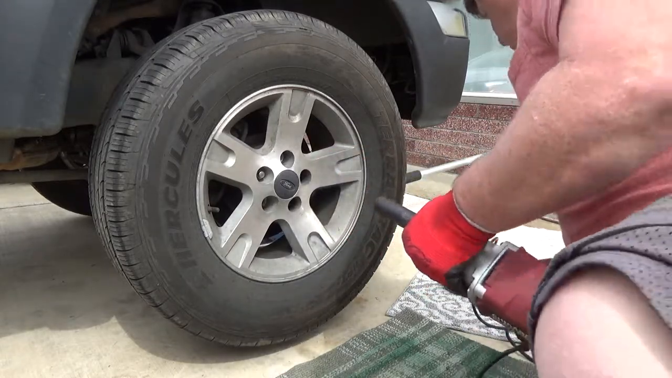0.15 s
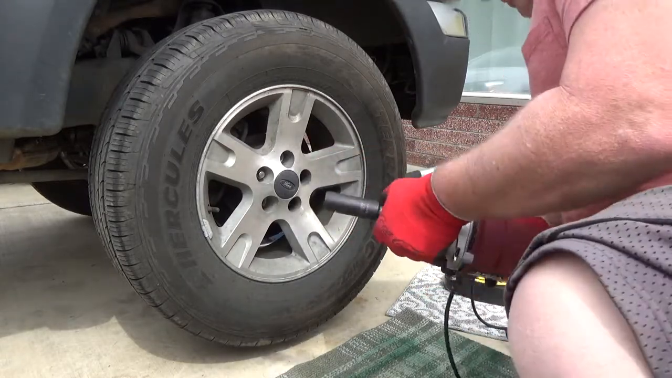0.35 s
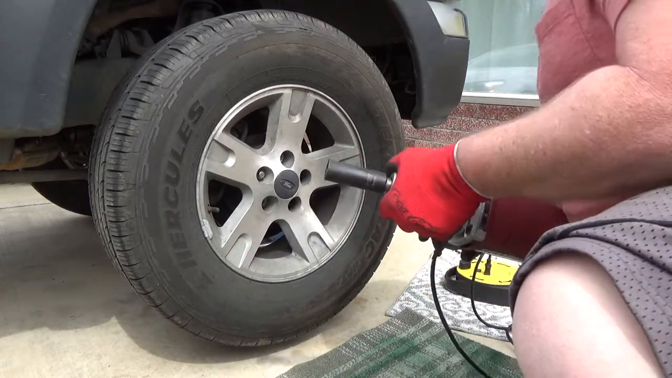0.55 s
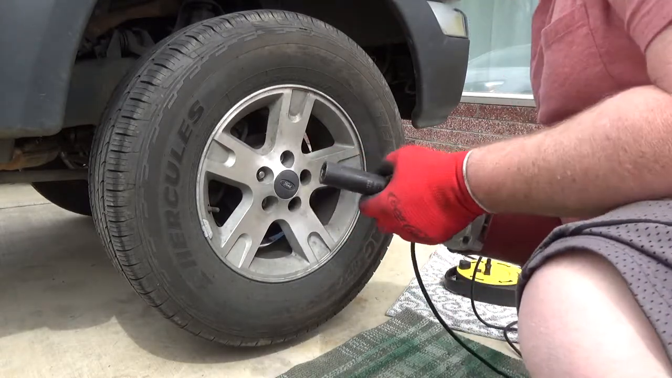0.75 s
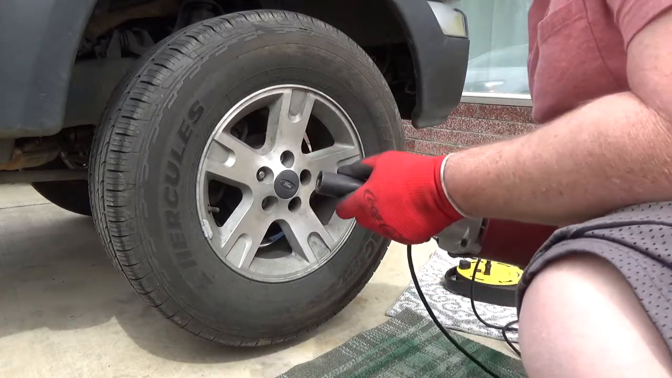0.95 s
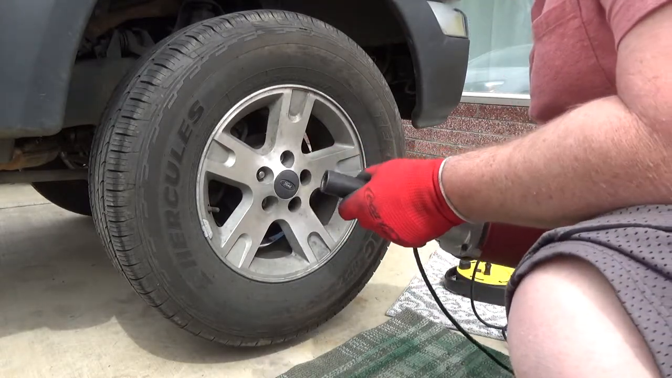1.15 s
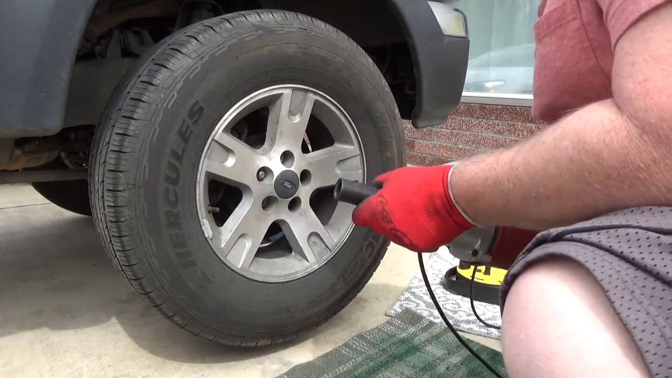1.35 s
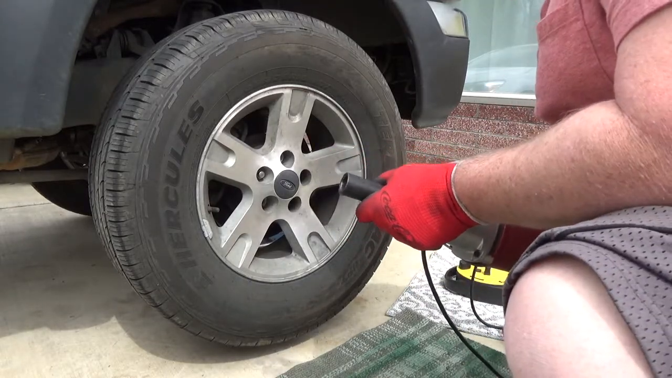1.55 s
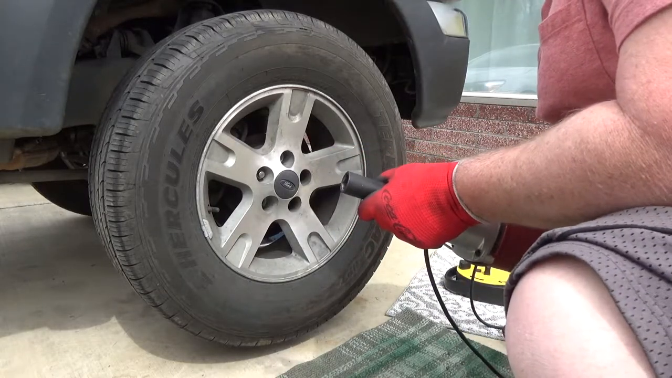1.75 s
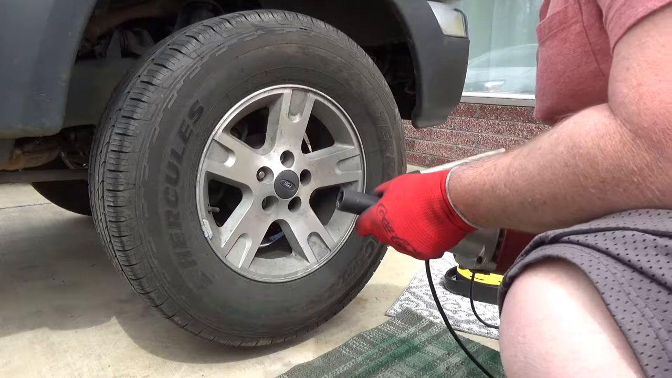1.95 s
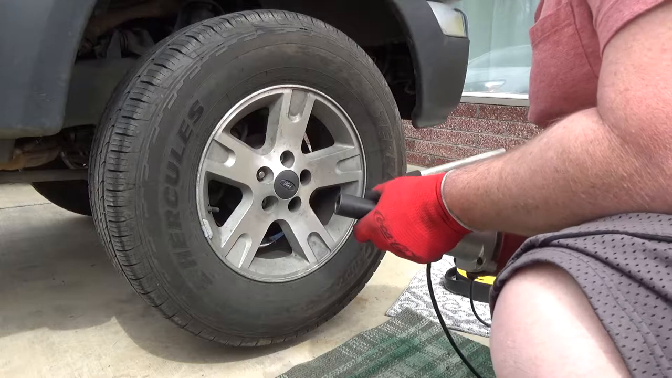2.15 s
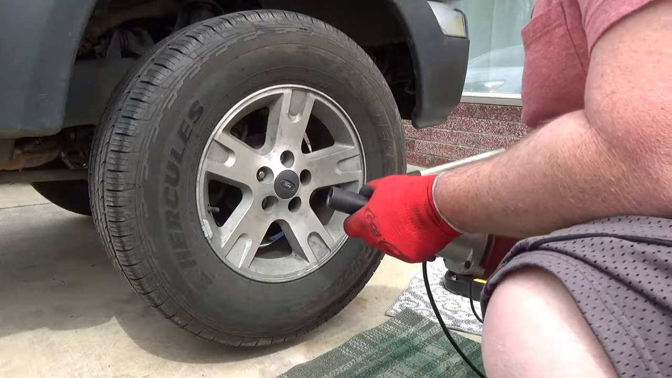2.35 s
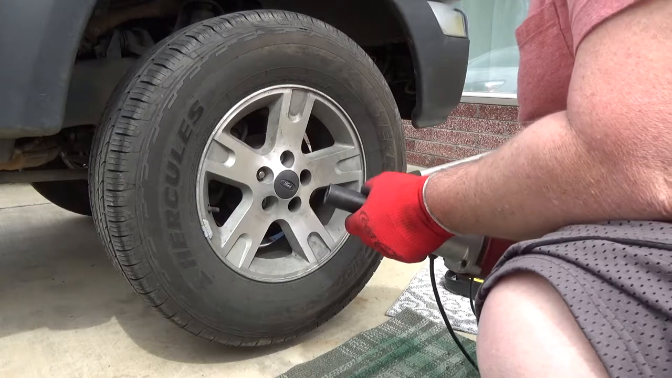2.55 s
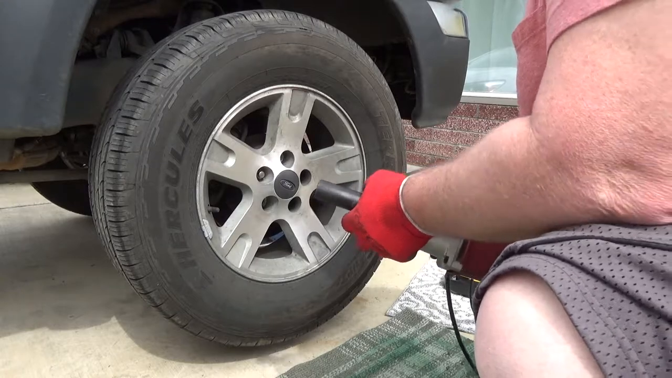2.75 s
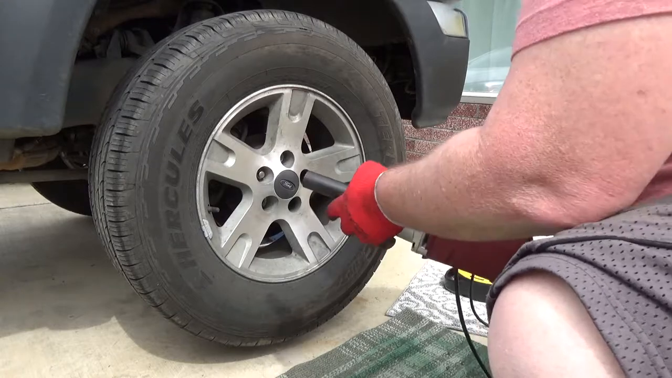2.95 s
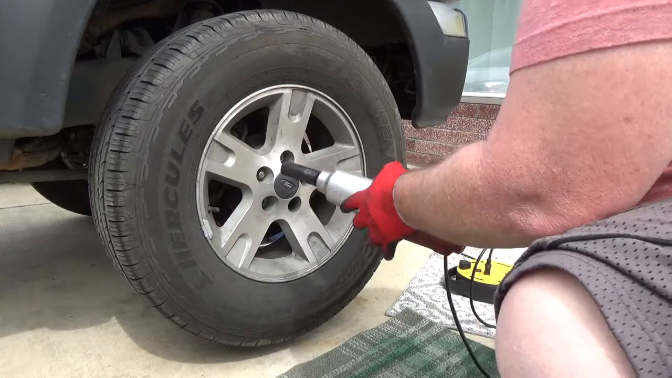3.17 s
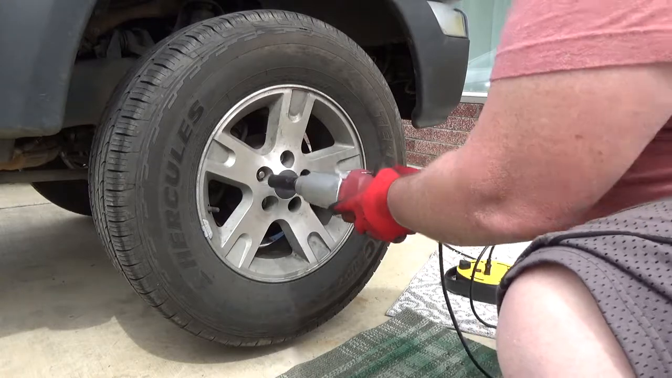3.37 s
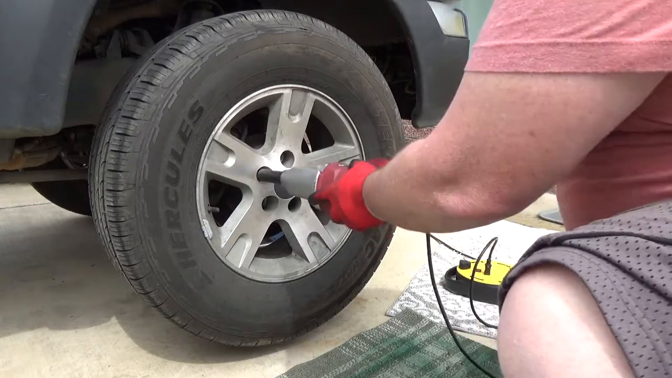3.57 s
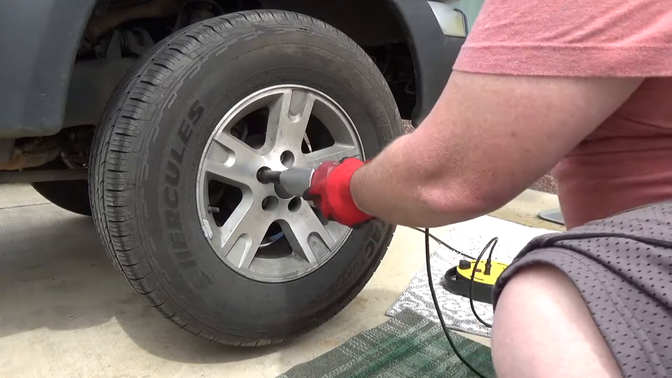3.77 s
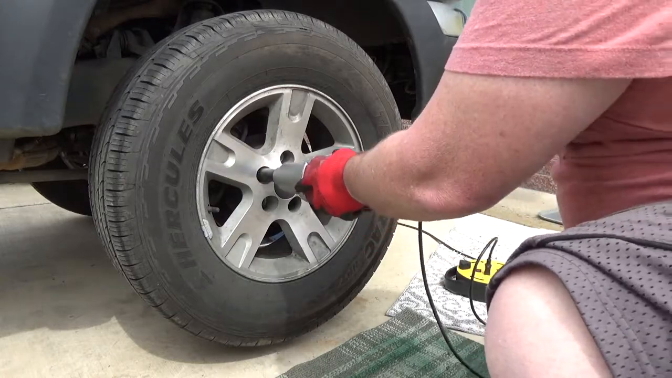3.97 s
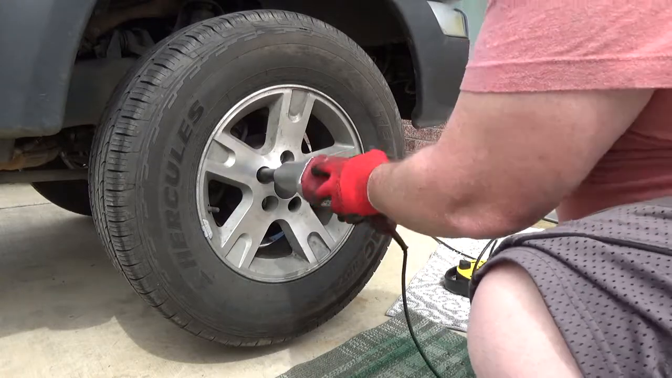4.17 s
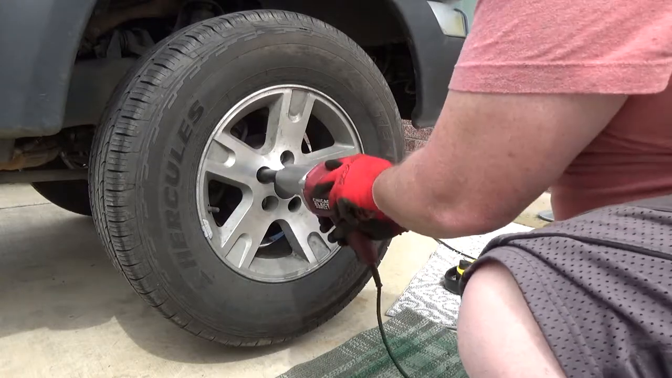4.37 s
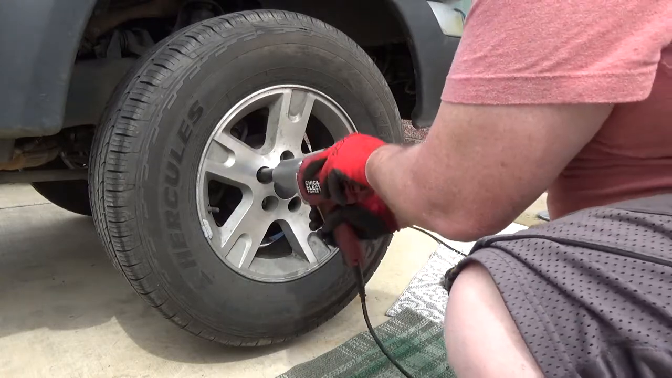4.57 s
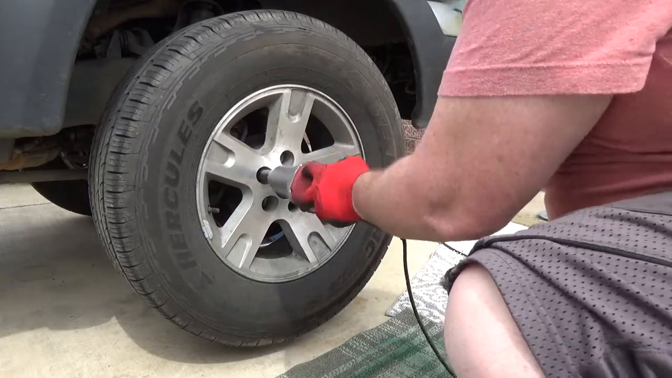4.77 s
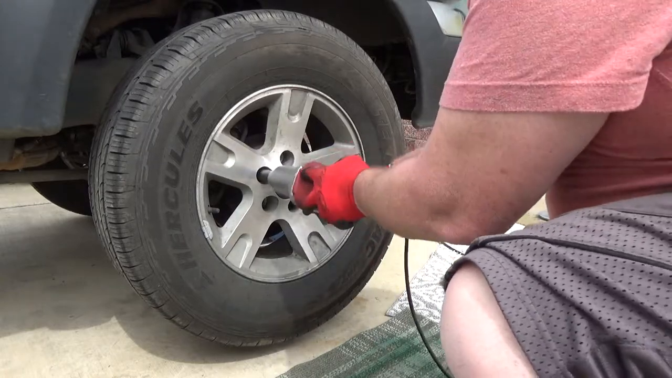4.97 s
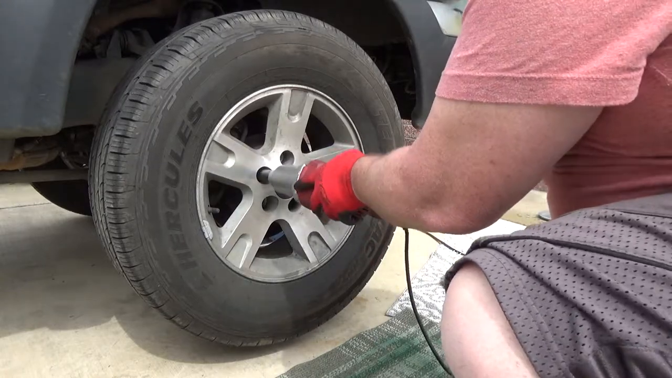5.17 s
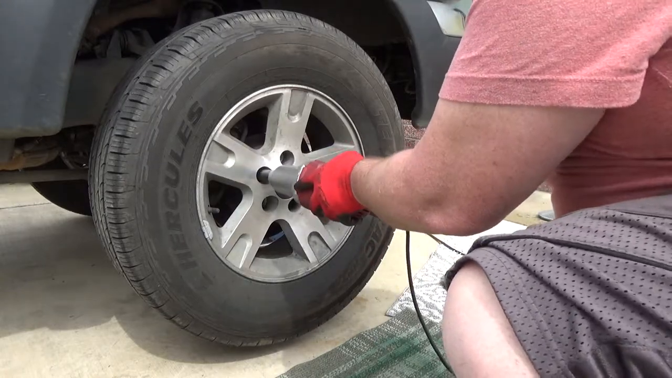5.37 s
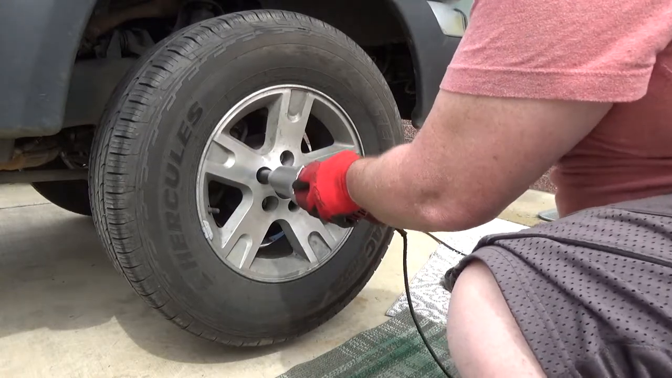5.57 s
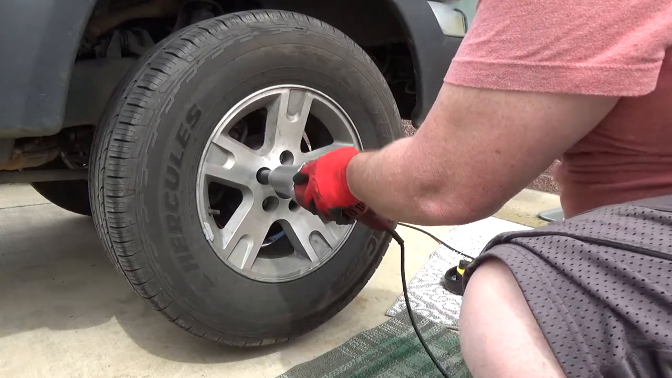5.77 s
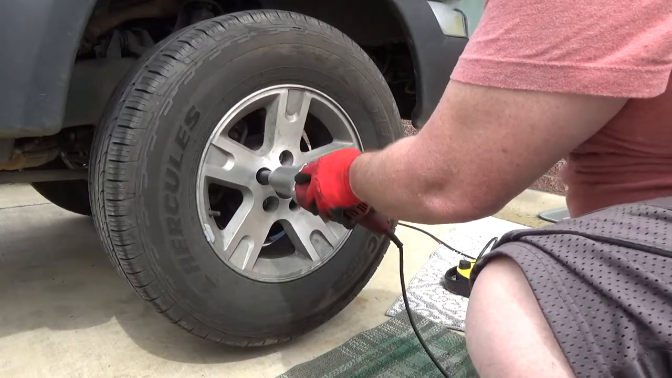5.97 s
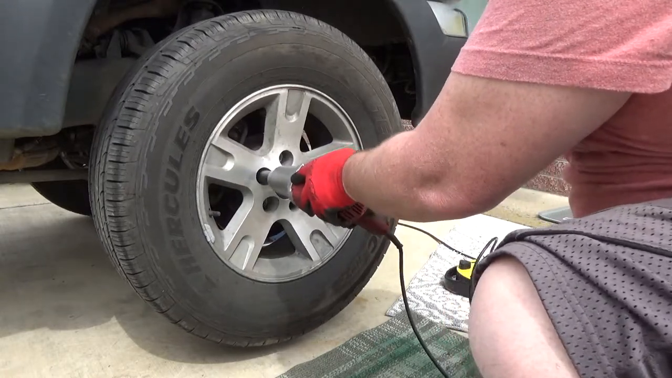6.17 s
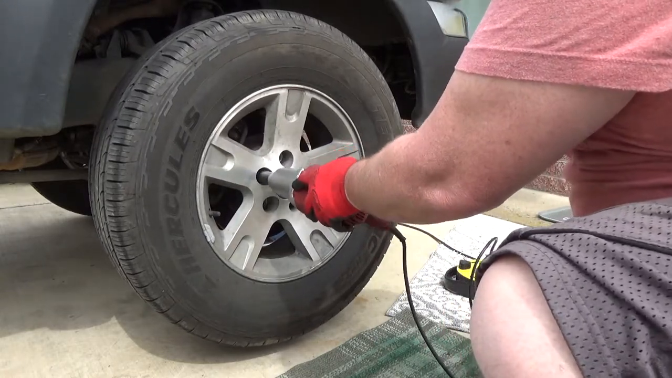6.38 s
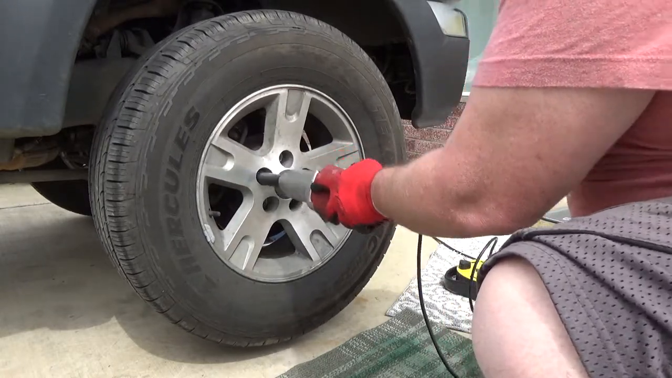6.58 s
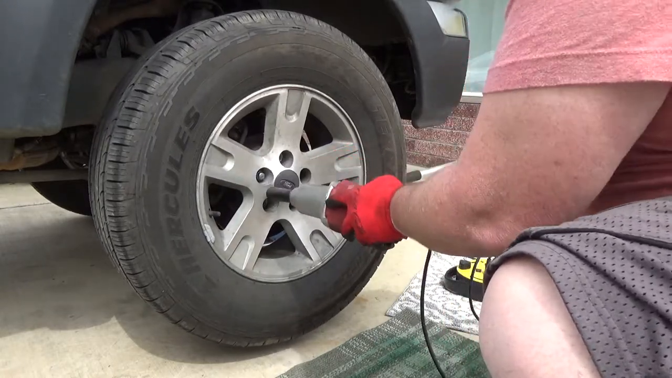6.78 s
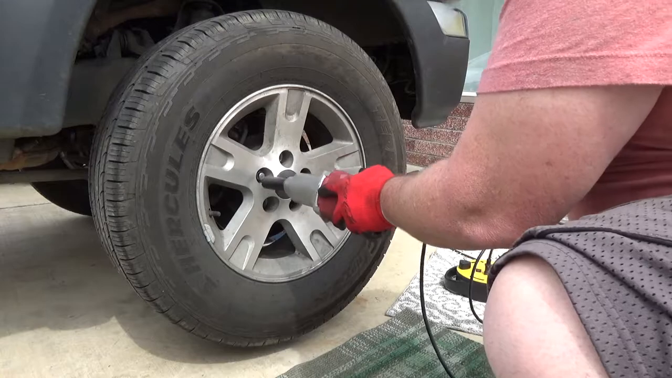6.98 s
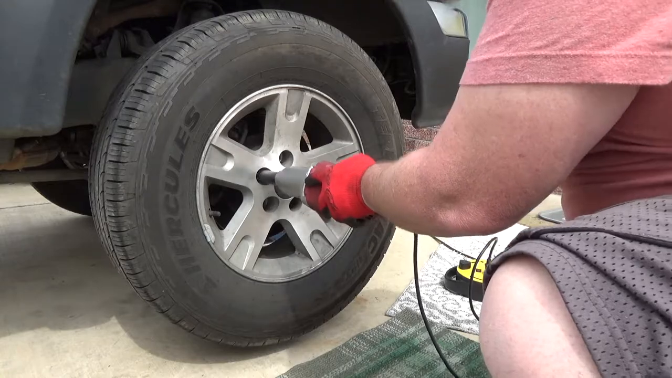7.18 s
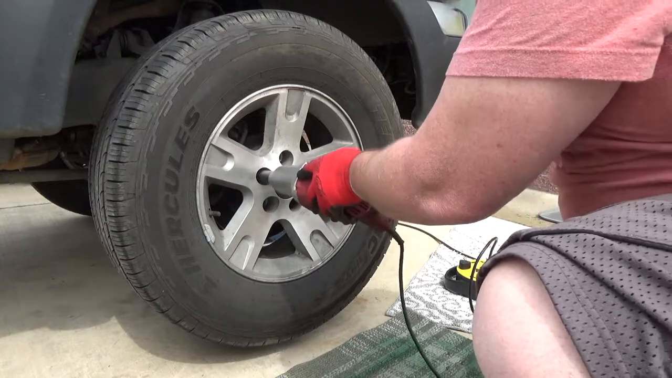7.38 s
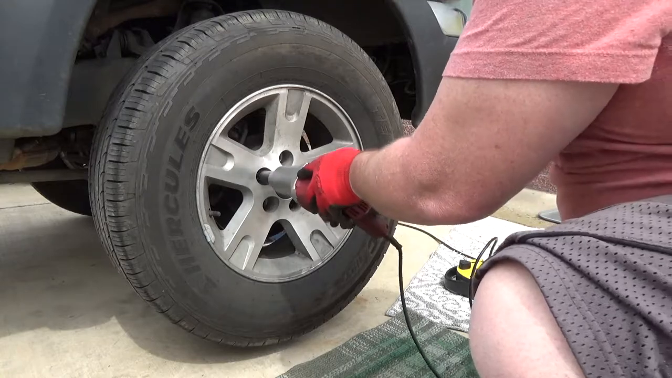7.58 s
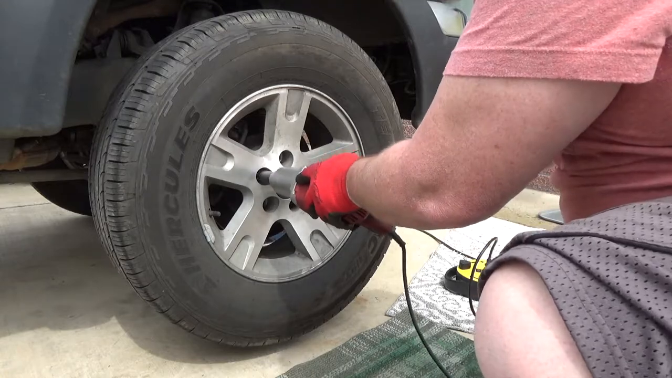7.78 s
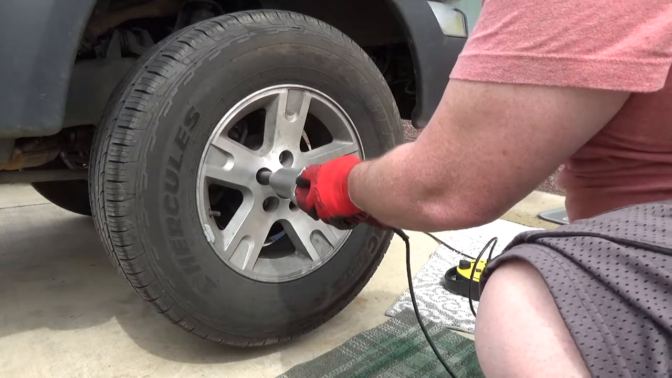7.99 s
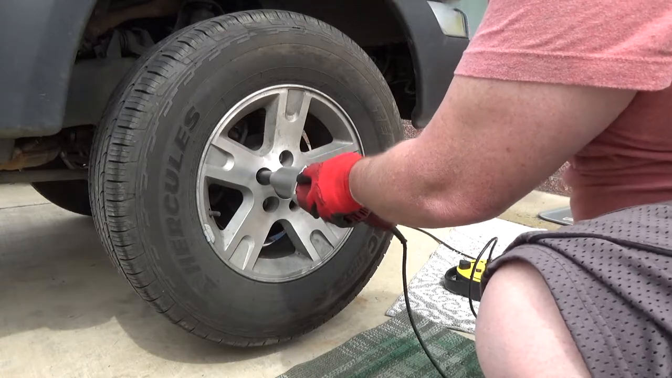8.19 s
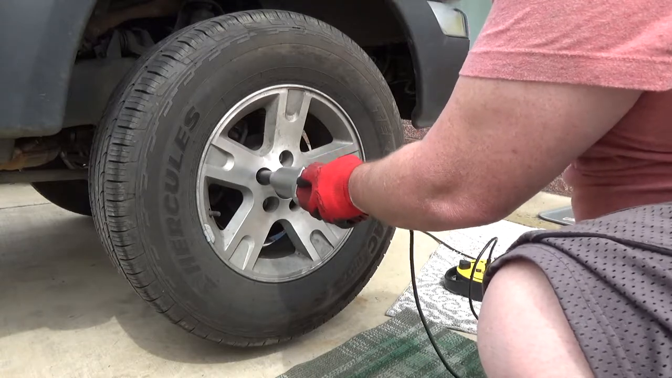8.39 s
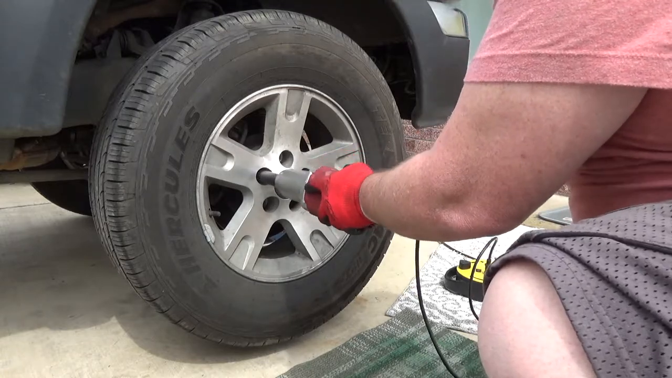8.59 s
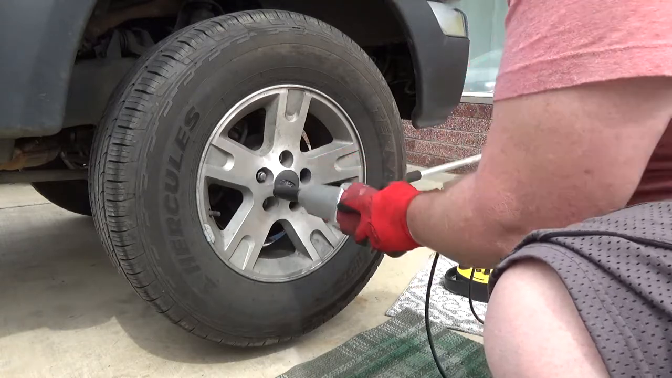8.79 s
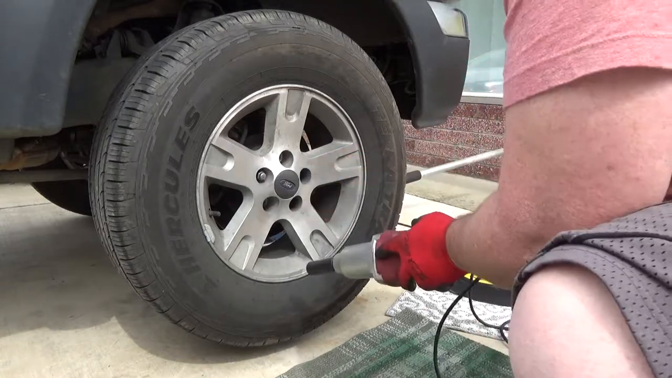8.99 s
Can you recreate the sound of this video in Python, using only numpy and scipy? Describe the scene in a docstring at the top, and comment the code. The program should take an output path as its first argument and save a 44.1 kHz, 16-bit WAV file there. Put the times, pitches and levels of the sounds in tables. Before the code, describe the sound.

A corded impact wrench works close by in a yard, with short echoes, faint outdoor hiss and a distant machine's hum. After a light knock, the motor spins up in the air at about 1.1 seconds and again at 2.1, each time whining and chattering as it winds down. A brief gust rumbles on the microphone at 1.6. From 3 to 5 seconds, gloves rub softly and the steel socket clicks and knocks onto a wheel nut. At 5.5 a sharp clank starts the loudest part: rapid hammering for just over half a second, leaving the wheel ringing briefly. Small clicks follow around 7 seconds. At 7.6 the motor runs again with hard knocks, then a few quick blows and a tiny squeak near 7.9 as a second nut loosens. Scattered clinks and soft rustling continue until about 9 seconds.

```python
"""A corded impact wrench works on a car wheel in a driveway. Its motor spins up twice in the air, with
chattering gear teeth, a hissing fan and a whine. The socket is knocked onto a wheel nut, and a hammer
inside the tool strikes fast blows that loosen the nut and make the wheel ring. A second nut spins off
with a squeak. Steel clicks and rubbing gloves fill the pauses, and one gust of air rumbles by.
The yard adds short echoes, a soft outdoor hiss and the hum of a far machine."""
import sys
import numpy as np
from scipy import signal
from scipy.fft import rfft, irfft
from scipy.io import wavfile
from scipy.ndimage import uniform_filter1d

SR = 44100
rng = np.random.default_rng(int(sys.argv[2]) if len(sys.argv) > 2 else 0)


def waveform_to_disk(signal):
    """Save audio, clipped to [-1, 1], as 16-bit WAV at the path in sys.argv[1]."""
    frames = np.transpose(np.atleast_2d(signal))
    scaled = np.clip(frames, -1, 1) * 32767
    samples = np.round(scaled).astype(np.int16)
    wavfile.write(sys.argv[1], SR, samples)


N = 398663
TIME = np.arange(N) / SR

# tone of the outdoor hiss: (frequency [Hz], level [dB])
AIR_TONE = [(15, -57), (25, -31.5), (86, -14), (156, -8), (260, -10), (567, -1.5), (648, 0), (804, -3),
            (1380, -5), (1570, -8), (2300, -7), (4150, -9), (4620, -11.5), (5880, -11), (15500, -29.5)]
# level of the background hiss, which the recorder's automatic gain turns down after the loud
# hammering and slowly brings back: (time [s], level [dB])
AIR_LEVEL = [(0, -53.5), (5.4, -54.5), (6.35, -60), (6.75, -68), (7.5, -64.5), (9.04, -62.5)]
# the part of the hiss that differs between the ears: (frequency [Hz], level [dB])
AIR_WIDTH = [(100, -19.5), (1000, -1.0), (4000, -1.5), (12000, -10.0)]

# knocks of socket, nut and drive: (time [s], knock [dB], thump [dB], clink [dB], tick [dB],
# time to fade by 60 dB [s], rings most near [Hz])
KNOCKS = [(0.293, -40, -65, -43.5, -57, 0.056, 1950), (1.135, -40, -49, -23, -29.5, 0.015, 4240),
          (1.814, -55, -68, -50, -53, .03, 1930), (2.109, -31, -54, -15, -17.5, 0.021, 5670),
          (3.722, -39.5, -53, -43, -79, 0.063, 1170), (3.875, -28.5, -52, -33.5, -54, 0.036, 1950),
          (3.901, -35, -60, -37, -50, 0.055, 4240), (3.924, -33, -53, -35, -49, 0.053, 1920),
          (3.933, -27.5, -45, -26.5, -35, 0.046, 4020), (3.943, -21, -36.5, -22, -43, 0.067, 4240),
          (4.097, -40, -53, -45.5, -57, 0.025, 1950), (4.541, -36, -41.5, -43, -57, 0.059, 1170),
          (4.718, -27, -44, -21, -30.5, 0.041, 5670), (4.812, -29.5, -36, -38, -43, 0.047, 1560),
          (4.818, -22, -29, -25, -35.5, 0.044, 1580), (4.887, -37.5, -46.5, -34, -42, 0.041, 1560),
          (5.491, -9.5, -36, -10, -27.5, 0.056, 1780), (6.154, -30, -50, -46, -36.5, 0.033, 1550),
          (6.359, -48.5, -70.5, -53, -63, 0.023, 1546), (6.517, -49, -68, -56, -76, 0.036, 1750),
          (7.084, -41, -61, -35, -80, 0.021, 1180), (7.209, -37.5, -59, -38, -54, 0.11, 1920),
          (7.286, -46.5, -68, -41, -63, .025, 4240), (7.316, -35, -56, -38, -60, 0.032, 4360),
          (7.592, -24.5, -44.5, -22.5, -36.5, 0.038, 1530), (7.608, -18, -44.5, -22, -43, 0.073, 1580),
          (7.642, -28, -44.5, -15.5, -24, 0.018, 5670), (7.965, -20, -43, -17.5, -25, 0.017, 1720),
          (8.143, -26.5, -51, -30.5, -49, 0.024, 1770), (8.192, -34.5, -55.5, -37, -47, 0.051, 1762),
          (8.245, -45, -66, -50, -57, .025, 1567), (8.434, -36, -72, -33.5, -47, 0.023, 4240),
          (8.646, -36.5, -72, -37.5, -46.5, .04, 14530), (8.701, -37.5, -69, -37, -48.5, 0.022, 4240),
          (8.907, -31, -61, -33, -55, 0.024, 4130)]
# tone of struck steel: (frequency [Hz], level [dB])
STEEL_TONE = [(600, 11.5), (6000, 15.5), (10000, 1.0), (15000, -17)]
# dull thump of the wheel and tyre: (frequency [Hz], level [dB])
THUMP_TONE = [(40, -30.5), (90, -11), (160, -2.5), (250, -2.5), (350, 6), (480, -1), (700, -9), (1500, -36)]
# notes of a knocked socket: (pitch [Hz], level next to the knock [dB], time to fade by 60 dB [s])
SOCKET_NOTES = [(1167, -0.5, 0.11), (1548, -3, 0.084), (1765, -1.5, .05), (1954, -3.5, .05),
                (4060, -5, .05), (4240, -4, 0.045), (5700, -2, .05), (14530, -12.5, .035)]

# movements of gloves and clothes: (start [s], swell [s], fade [s], peak level [dB])
RUBS = [(.3, .5, 0.23, -43.5), (3.05, 0.13, 0.25, -39.5), (4.0, 0.23, 0.27, -38.5),
        (4.98, .085, 0.045, -41), (6.42, 0.16, 0.095, -49.5), (8.5, 0.2, 0.25, -45.5)]
# tone of rubbing cloth: (frequency [Hz], level [dB])
CLOTH_TONE = [(40, -55), (200, -3), (900, -1.5), (2200, 3), (4000, 3.5), (6000, 4), (9000, -6),
              (12000, -14.5), (15500, -35.5)]

# pulls of the trigger: (time [s], held [s], top speed [turns/s], spin-up [s], braking [turns/s per s],
# coasts below [turns/s], on a nut [0 or 1], body [dB], treble [dB], fizz [dB], whine [dB],
# jingle pitch [Hz], jingle [dB])
PULLS = [(1.09, 0.14, 420.7, .068, 672.6, 56.6, 0, -18, -19, -25.5, -1, 2133, -24.5),
         (2.058, 0.24, 389.4, .055, 648.6, 149.4, 0, -21, -16.5, -26, 1, 1704, -31.5),
         (5.465, 0.48, 274.9, .036, 957.7, 41.1, 1, -21.5, -17.5, -22.5, -1, 1608, -31),
         (7.565, 0.14, 349.5, .05, 659, 34.98, 1, -24, -22, -28, 1.5, 1690, -27.5)]
# click of the switch: (knock [dB], thump [dB], clink [dB], tick [dB], time to fade by 60 dB [s])
SWITCH_CLICK = (-36, -51, -32, -38, 0.1)
# tone of the tool in the air and on a nut: (frequency [Hz], level [dB])
IN_AIR_TONE = [(40, -32.5), (150, -37.5), (280, -20.5), (500, -7), (1400, -2), (3000, 6.5), (6200, 10.5),
               (7300, -4), (10000, -13.5), (12500, -26), (15500, -42.5)]
ON_NUT_TONE = [(40, -24), (150, -17.5), (280, -11), (500, -4), (1400, 5.5), (3000, 5.5), (6200, 14),
               (7300, 0.5), (10000, -6.5), (12500, -20), (15500, -24.5)]
# pitches the tool rings at, in the air and on a nut: (pitch [Hz], width [Hz], boost [dB])
IN_AIR_PEAKS = [(600, 340, 8.5), (782.5, 81, 10.6), (1136, 200, 8.4), (1570, 44, 5.9), (1751, 83, 8.7),
                (1913, 370, 9.2), (2373, 61, 7.1), (2560, 280, 2.4), (3380, 92, 3.1), (3684, 23, 8.5),
                (4320, 1400, 5.5), (5130, 520, 3.2), (5474, 140, 6.3), (5884, 130, 6.4), (8930, 1200, 6.3)]
ON_NUT_PEAKS = [(670, 170, 5.9), (1195, 280, 5.4), (1585, 120, 5.7), (1850, 230, 5.5), (2320, 910, 3.4),
                (2790, 48, 5.8), (3064, 86, 4.9), (3855, 1100, 7.2), (4210, 640, 4.7), (6100, 490, 4),
                (6820, 82, 5.5), (7540, 68, 3.8), (8100, 550, 4.8), (9060, 740, 5.7), (9900, 910, 3.6)]
# whine of the four-tooth gear and the fan: (cycles per turn, level in the air [dB], level on a nut [dB])
WHINES = [(4, -15, -26), (6, -21, -28), (8, -13.5, -20), (12, -14, -16), (16, -15.5, -23), (18, -17.5, -25),
          (20, -11.5, -11), (24, -15.5, -17)]
# how well the casing gives off the whine: (frequency [Hz], level [dB])
CASING_TONE = [(300, -28), (600, -7), (1500, -2), (2500, 0), (4200, 5), (5700, 4), (6600, -2), (7500, -20)]
# how body, treble, fizz and jingle grow with speed, one row each:
# (levels off at [turns/s], drop at a tenth of that speed [dB], build-up [s])
GROWTH = [(161.8, 25, .008), (200, 37.5, 0.023), (251, 35.5, 0.043), (100, 30, .008)]
# the clatter surges and sags: (swings [1/s], depth in the air [dB], depth on a nut [dB])
SURGE = (40, .6, 1.1)

# tone of the gust: (frequency [Hz], level [dB])
GUST_TONE = [(25, -19), (60, -7.5), (120, 3.5), (300, 4.5), (600, -9.5), (2000, -47.5)]

# hammering, one list for each nut: (time [s], blows [1/s], level [dB])
HAMMERING = [
    [(5.521, 32.8, -25), (5.585, 32, -15.5), (5.69, 30.4, -20), (5.74, 40.8, -13.5), (5.81, 35.6, -15),
     (5.9, 32.6, -16.5), (6.0, 28, -20), (6.085, 46, -19)],
    [(7.855, 30, -20.5), (7.872, 92, -14), (7.897, 91, -21)],
]
# tone of one blow: (frequency [Hz], level [dB])
BLOW_TONE = [(40, -40.5), (300, -11), (1500, 3), (4000, -0.5), (6500, 6.5), (9500, -1), (12500, -11.5),
             (15500, -22.5)]
# notes of the wheel and brake after a blow: (pitch [Hz], level [dB], time to fade by 60 dB [s])
WHEEL_NOTES = [(567, -37.5, 1.2), (1170, -31, .7), (1508, -28.5, 0.94), (2051, -31, .6)]
# squeaks of the loose nut: (time [s], length [s], first pitch [Hz], last pitch [Hz], level [dB])
SQUEAKS = [(7.917, 0.006, 11200, 10000, -21), (7.924, 0.002, 6240, 4900, 0),
           (7.926, 0.011, 5140, 5350, -14.5)]

# how long the yard echoes: (frequency [Hz], time to fade by 60 dB [s])
ECHO_FADE = [(150, .22), (700, 0.58), (1500, 0.21), (4000, 0.22), (12000, 0.2)]
# tone of the echoes: (frequency [Hz], level [dB])
ECHO_TONE = [(60, -14), (250, -26.5), (700, -11.5), (2000, -7.5), (5000, -13.5), (12000, -13.5)]

STOP_SPEED = 21.9  # turns a second; any slower and the motor stops


def amp(db):
    """Turns decibels into a number to multiply by."""
    return 10 ** (np.asarray(db) / 20)


def evened(x):
    """Scales a signal to an average power of 1."""
    return x / np.sqrt(np.mean(x ** 2) + 1e-20)


def read(points, hz):
    """Reads between the rows of a frequency table, with octaves evenly spaced."""
    row_hz, value = np.transpose(points)
    return np.interp(np.log(hz + 1), np.log(row_hz + 1), value)


def add(mix, s, sound):
    """Adds a sound to the mix, s seconds in."""
    part = mix[max(round(s * SR), 0):][:len(sound)]
    part += sound[:len(part)]


def wander(count, per_s):
    """A random wobble that heads for a new value per_s times a second."""
    targets = rng.standard_normal(8192)
    return evened(np.interp(np.arange(count) * per_s / SR, np.arange(len(targets)), targets))


def boost_db(peaks, hz):
    """How much louder a sound gets near the pitches an object rings at."""
    return sum(db / (1 + (2 * (hz - pitch) / width) ** 2) for pitch, width, db in peaks)


def colour(x, tone, peaks=(), size=4096):
    """Gives a sound a broad tone and ringing peaks."""
    hz = abs(np.fft.fftfreq(size, 1 / SR))
    gain = amp(read(tone, hz) + boost_db(peaks, hz))
    spectrum = np.exp(np.conj(signal.hilbert(np.log(gain))))  # rings after a hit, never before
    response = np.fft.ifft(spectrum).real
    return signal.oaconvolve(x, response[:size // 2])[:len(x)]


def band(x, low_hz, high_hz, order=3):
    """Keeps the sound between two frequencies."""
    return signal.sosfilt(signal.butter(order, [low_hz, high_hz], "band", fs=SR, output="sos"), x)


def burst(fade_s, size=6000, rise_s=0.00018):
    """Many tiny contacts make a noise that jumps up, then drops 60 dB in fade_s."""
    t = np.arange(size) / SR
    return rng.standard_normal(size) * (1 - np.exp(-t / rise_s)) * amp(-60 * t / fade_s)


def hit_level(x, db):
    """Scales a hit so that its energy, spread over 10 ms, has this level."""
    return amp(db) * x / np.sqrt(np.sum(x ** 2) / (SR / 100))


def outdoors(hum_hz=163, hum_db=-18, side_db=-6, lean_db=0.4):
    """A distant hiss, nearly the same at both ears in the bass, and a far machine's wavering hum."""
    middle = evened(colour(rng.standard_normal(N), AIR_TONE))
    side = evened(colour(rng.standard_normal(N), AIR_TONE))
    side = colour(side, AIR_WIDTH) * amp(side_db)
    hum_gain = amp(hum_db + wander(N, 20))
    hum = hum_gain * evened(np.sin(2 * np.pi * hum_hz * TIME + .4 * wander(N, 5.2)))
    ears = np.array([middle + side + hum, middle - side + hum]) * amp([[-lean_db], [lean_db]])
    return ears * amp(np.interp(TIME, *np.transpose(AIR_LEVEL)))


def knock(db, thump_db, clink_db, tick_db, fade_s, struck_hz=1750):
    """Steel hits steel: a low thump, the knock itself, a clink, a high tick and a ringing socket."""
    steel = colour(burst(fade_s), STEEL_TONE, ON_NUT_PEAKS)
    t = np.arange(len(steel)) / SR
    thump = colour(burst(fade_s * 3.6), THUMP_TONE)  # the wheel's thump lasts longer
    parts = [(thump, thump_db), (band(steel, 650, 2000), db),
             (band(steel, 2000, 6600), clink_db), (band(steel, 7200, 11000, order=4), tick_db)]
    for hz, note_db, ring_s in SOCKET_NOTES:
        # notes within about 3% of the struck pitch ring most; the further off, the weaker
        miss = 1 - np.exp(-(np.log(hz / struck_hz) / .033) ** 2)
        loss_db = 18.5 * miss + 4.5 * abs(np.log2(hz / struck_hz))
        ring = np.sin(2 * np.pi * hz * t + wander(len(t), 600)) * amp(-60 * t / ring_s)
        parts.append((band(ring, 500, 16000), db + note_db - loss_db))
    return sum(hit_level(part, level_db) for part, level_db in parts)


def socket_knocks(knock_trim_db=-3, thump_trim_db=-1):
    """The socket knocks as it goes on and off the nuts and as the drive takes up its slack."""
    out = np.zeros(N)
    for s, db, thump_db, *rest in KNOCKS:
        add(out, s, knock(db + knock_trim_db, thump_db + thump_trim_db, *rest))
    return out


def glove_rustle(trim_db=-10.5, grain_db=2, edge_db=-6):
    """Rubbing cloth makes a grainy noise that swells and fades with each movement."""
    level = np.zeros(N)
    for s, swell, fade, db in RUBS:
        t = np.arange(0, swell + fade, 1 / SR)
        arch_db = np.interp(t, [0, swell, swell + fade], [edge_db, 0, edge_db])
        add(level, s, amp(db + arch_db + trim_db) * signal.windows.tukey(len(t), .25))
    grains = rng.standard_normal(N) * amp(grain_db * wander(N, 210))
    return level * evened(colour(grains, CLOTH_TONE))


def motor_speed(held_s, top_speed, spin_up_s, braking, coast_speed):
    """Turns a second: the motor speeds up while the trigger is held, brakes, then coasts to a stop."""
    driven = top_speed * (1 - np.exp(-np.arange(1, held_s * SR) / SR / spin_up_s))
    braked = driven[-1] - braking * np.arange(SR) / SR
    coasting = coast_speed * np.exp(np.minimum(braked / coast_speed - 1, 0))
    slowing = np.where(braked > coast_speed, braked, coasting)
    return np.concatenate([np.maximum(driven, STOP_SPEED), slowing[slowing > STOP_SPEED]])


def gear_rattle(turns, speed, chatter_db=1, uneven_db=4, chatter_s=.001, flutter_db=.66):
    """Each gear tooth makes loose parts chatter, while the fan and the motor's brushes hiss."""
    count = len(turns)
    teeth = np.diff(np.floor(4 * turns), prepend=0)  # four clicks a turn
    clicks = teeth * amp(uneven_db * np.clip(wander(count, 1500), -2, 2)) / np.sqrt(speed)
    energy = signal.lfilter([1], [1, -np.exp(-1 / (chatter_s * SR))], clicks ** 2)
    chatter = evened(np.sqrt(energy) * rng.standard_normal(count))
    hiss = rng.standard_normal(count)
    return evened(amp(chatter_db) * chatter + hiss) * amp(flutter_db * wander(count, 220))


def gear_whine(turns, speed, on_nut, whine_db, peaks, best_speed=235, speed_range=90):
    """Gear and fan tones follow the speed. They sing most at middle speed and where the tool rings."""
    singing = np.exp(-((speed - best_speed) / speed_range) ** 2)
    strength = (.66 + .34 * singing) * np.minimum(speed / best_speed, 1)
    out = np.zeros(len(turns))
    for per_turn, air_db, nut_db in WHINES:
        hz = per_turn * speed
        db = whine_db + (nut_db if on_nut else air_db) + read(CASING_TONE, hz) + .3 * boost_db(peaks, hz)
        gain = amp(db + 3 * wander(len(turns), 70))
        out += gain * np.sin(2 * np.pi * per_turn * turns + .33 * wander(len(turns), 150))
    return strength * out


def socket_jingle(count, hz, width_hz=330, uneven_db=5.5):
    """The loose socket jingles: a narrow band of flickering noise."""
    shaking = rng.standard_normal(count) * amp(uneven_db * wander(count, 120))
    return evened(band(shaking, hz - width_hz / 2, hz + width_hz / 2, order=2))


def split_in_three(x):
    """Splits a sound at 3 and 7 kHz into body, treble and fizz of equal power."""
    spectrum, hz = rfft(x, 2 * SR), np.fft.rfftfreq(2 * SR, 1 / SR)
    over_3k = 1 / (1 + (3000 / (hz + 1)) ** 12)
    over_7k = 1 / (1 + (7000 / (hz + 1)) ** 16)
    shares = (1 - over_3k, over_3k - over_7k, over_7k)
    return [evened(irfft(spectrum * share)[:len(x)]) for share in shares]


def growth(t, speed, full_speed, drop_db, build_up_s):
    """One part of the motor's noise builds up, and grows with speed until it levels off."""
    moving = np.sqrt(np.clip(speed / STOP_SPEED - 1, 0, 1))  # fades as the motor comes to rest
    slow_db = -drop_db * np.log10(1 + (full_speed / speed) ** 4) / 4
    return moving * (1 - np.exp(-t / build_up_s)) * amp(slow_db)


def motor(speed, on_nut, body_db, treble_db, fizz_db, whine_db, jingle_hz, jingle_db):
    """Rattle and whine pass through the tool's body and the socket jingles; it all dulls as it slows."""
    count = len(speed)
    t = np.arange(count) / SR
    turns = np.cumsum(speed * (1 + .004 * wander(count, 250))) / SR
    tone, peaks = (ON_NUT_TONE, ON_NUT_PEAKS) if on_nut else (IN_AIR_TONE, IN_AIR_PEAKS)
    rattle = evened(colour(gear_rattle(turns, speed), tone, peaks))
    whine = gear_whine(turns, speed, on_nut, whine_db, peaks)
    parts = split_in_three(rattle + whine) + [socket_jingle(count, jingle_hz)]
    levels = (body_db, treble_db, fizz_db, jingle_db)
    # the starting current jolts the drive, so for a moment it is as loud as if it ran faster
    effort = speed + 54.2 * np.exp(-t / .0067)
    out = sum(part * amp(db) * growth(t, effort, *row) for part, db, row in zip(parts, levels, GROWTH))
    per_s, air_db, nut_db = SURGE
    surge = amp((nut_db if on_nut else air_db) * wander(count, per_s))
    return out * surge * signal.windows.tukey(count, .01)


def wrench(motor_db=-1.5):
    """Each pull of the trigger clicks the switch and runs the motor."""
    out = np.zeros(N)
    for s, held_s, top_speed, spin_up_s, braking, coast_speed, on_nut, *voice in PULLS:
        speed = motor_speed(held_s, top_speed, spin_up_s, braking, coast_speed)
        add(out, s, motor(speed, on_nut, *voice) * amp(motor_db))
        add(out, s, knock(*SWITCH_CLICK))
    return out * hammer_flight()


def gust(start_s=1.565, length_s=.22, rise_s=.0098, db=-23, fade_db_per_s=111, lumps_db=5.5):
    """A gust of air buffets the microphone with a low, lumpy rumble and dies away."""
    out, t = np.zeros(N), np.arange(0, length_s, 1 / SR)
    lumps = rng.standard_normal(len(t)) * amp(lumps_db * wander(len(t), 70))
    level = np.minimum(t / rise_s, 1) * amp(db - fade_db_per_s * t) * signal.windows.tukey(len(t), .1)
    add(out, start_s, level * evened(colour(lumps, GUST_TONE)))
    return out


def blows():
    """Time and level of each blow: the hammer strikes whenever the cam that drives it slips."""
    rows = []
    for bout in HAMMERING:
        s, rate, db = np.transpose(bout)
        t = np.arange(s[0], s[-1], 1 / SR)
        slips = np.floor(np.cumsum(np.interp(t, s, rate)) / SR)
        rows += [(at, np.interp(at, s, db)) for at in t[np.diff(slips, prepend=-1) > 0]]
    return rows


def hammer_flight(dip=.8, length_s=.005, lead_s=.0045):
    """The motor's noise dips just before each blow, while the hammer is in flight."""
    gain = np.ones(N)
    for s, _ in blows():
        add(gain, s - lead_s, -dip * signal.windows.tukey(int(length_s * SR), .6))
    return gain


def hammer(fade_s=0.034, crack_db=-1, ring_db=-2, uneven_db=1.5):
    """Each blow cracks through the socket and leaves the wheel ringing."""
    out, t = np.zeros(N), np.arange(SR // 2) / SR
    for s, db in blows():
        crack = colour(burst(fade_s), BLOW_TONE, ON_NUT_PEAKS)
        add(out, s, hit_level(crack, db + crack_db - uneven_db * rng.standard_normal()))
        for hz, note_db, ring_s in WHEEL_NOTES:
            note = np.sin(2 * np.pi * (hz * t + rng.random()) + .5 * wander(len(t), 40))
            add(out, s, note * amp(db + ring_db + note_db - 60 * t / ring_s))
    return out


def nut_squeaks():
    """The loose nut sticks and slips, making tiny sliding tones."""
    out = np.zeros(N)
    for s, length_s, first_hz, last_hz, db in SQUEAKS:
        hz = np.linspace(first_hz, last_hz, int(length_s * SR))
        tone = np.sin(2 * np.pi * np.cumsum(hz) / SR + wander(len(hz), 810))
        add(out, s, amp(db) * evened(tone * signal.windows.tukey(len(hz), .5)))
    return out


def yard_echoes(x, size=16384, density=.12, gap_s=.0015):
    """Sound bounces off the ground, the car and the house wall, differently for each ear."""
    signs = rng.choice([-1., 1.], (2, size))
    bounces = signs * (rng.random((2, size)) < density) * (np.arange(size) > SR * gap_s)
    hz, t, spectra = signal.stft(bounces, SR, nperseg=256)
    fade = amp(-60 * t / read(ECHO_FADE, hz)[:, None])
    fade *= amp(read(ECHO_TONE, hz))[:, None] / np.sqrt(np.mean(fade ** 2, axis=1, keepdims=True))
    tail = signal.istft(spectra * fade, SR, nperseg=256)[1] / np.linalg.norm(bounces[0])
    return signal.fftconvolve(x[None], band(tail, 160, 16000, order=2), axes=1)[:, :N]


def scene():
    """The tool works close by, in the open yard."""
    near = wrench() + hammer() + socket_knocks() + nut_squeaks() + glove_rustle()
    left_db = np.interp(TIME, [2.6, 3.6], [-1.1, .4])  # the tool moves from the right to the wheel
    direct = near * amp(np.array([left_db, -left_db]) / 2)
    return direct + yard_echoes(near) + outdoors() + np.array([gust(), gust()])


def record(dry, limit_db=-13, recovery_db_per_s=500, ceiling=.68, top_hz=15900):
    """Turns the level down briefly after the hardest hits, rounds off peaks and cuts the top treble."""
    power = uniform_filter1d((dry ** 2).mean(0), size=64)
    power_db = 10 * np.log10(abs(power) + 1e-12)
    fall_db = TIME * recovery_db_per_s
    held_db = np.maximum.accumulate(power_db + fall_db) - fall_db  # jumps up at once, sinks steadily
    over_db = np.maximum(held_db - limit_db, 0)
    ducked = dry / amp(.75 * uniform_filter1d(over_db, size=32))
    rounded = ducked / (1 + (ducked / ceiling) ** 4) ** (1 / 4)
    treble_cut = signal.firwin(255, top_hz, window=("kaiser", 8), fs=SR)
    return signal.oaconvolve(rounded, treble_cut[None], "same")


dry = scene()
out = record(dry)
waveform_to_disk(out)
```